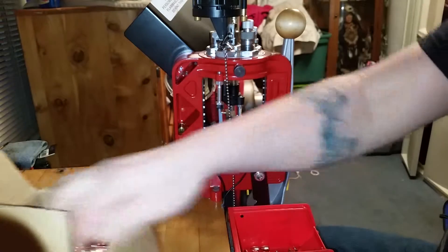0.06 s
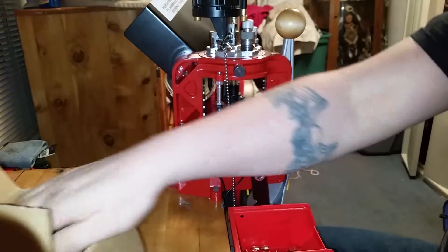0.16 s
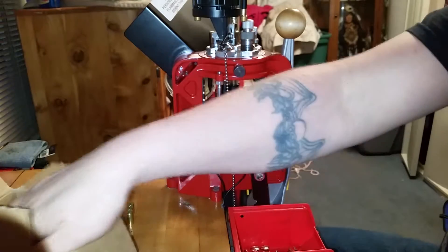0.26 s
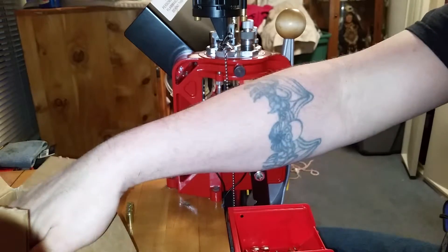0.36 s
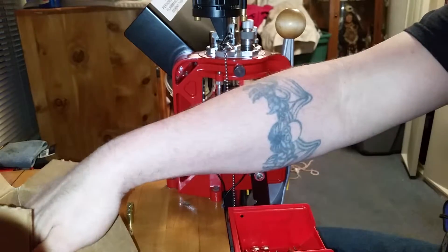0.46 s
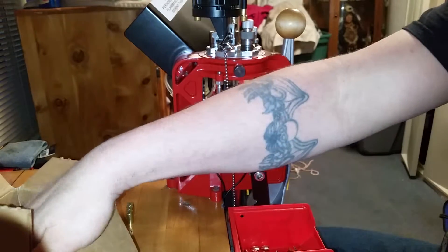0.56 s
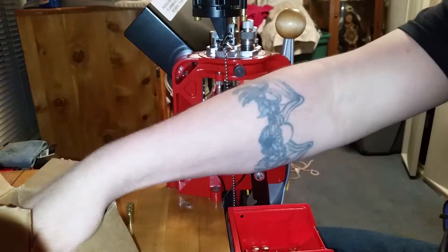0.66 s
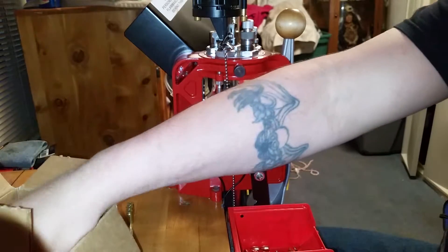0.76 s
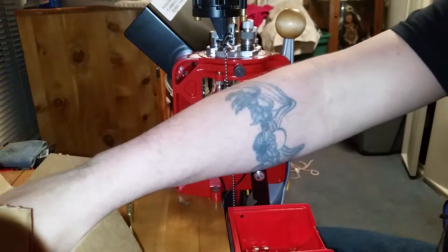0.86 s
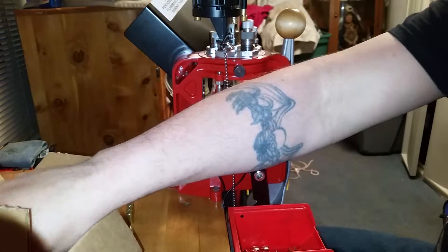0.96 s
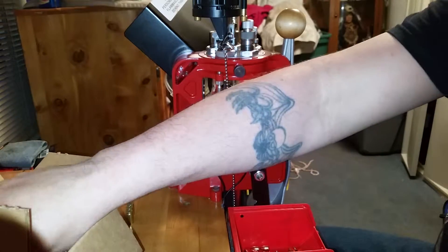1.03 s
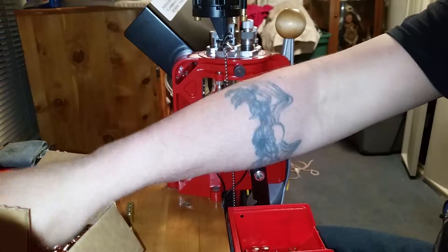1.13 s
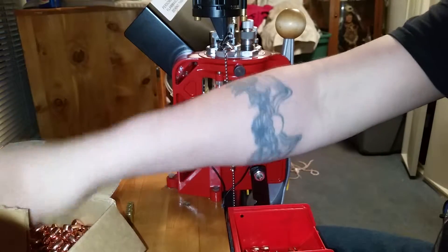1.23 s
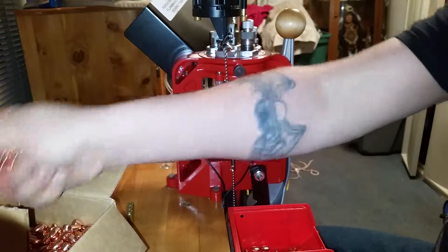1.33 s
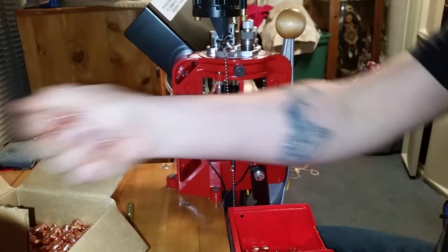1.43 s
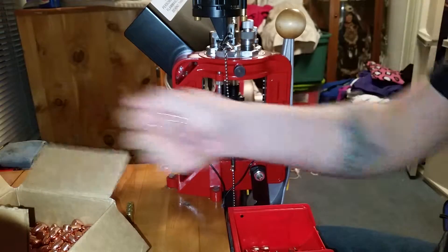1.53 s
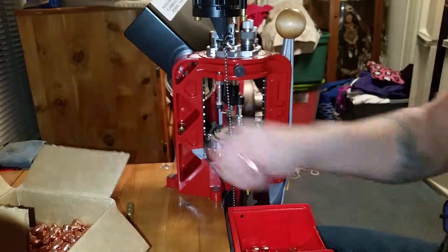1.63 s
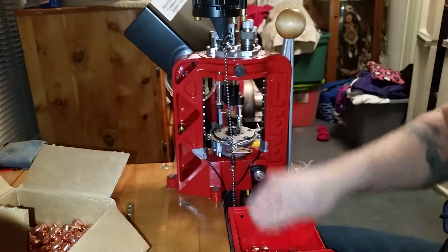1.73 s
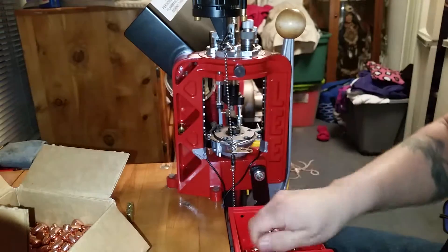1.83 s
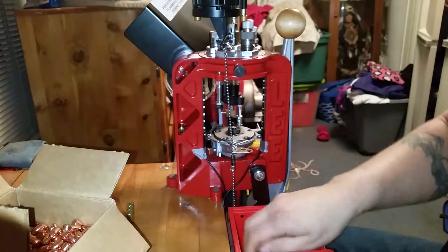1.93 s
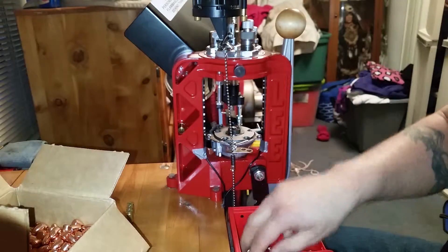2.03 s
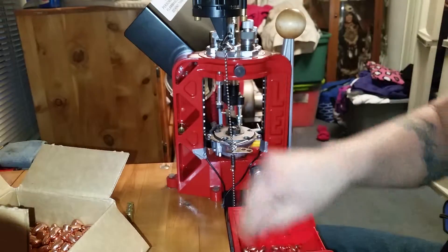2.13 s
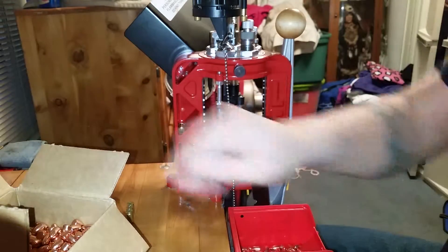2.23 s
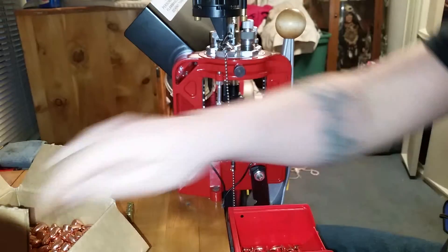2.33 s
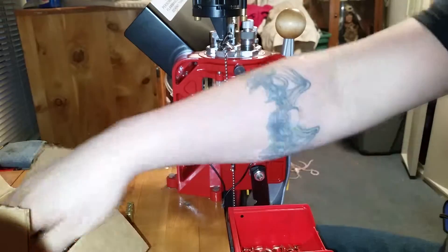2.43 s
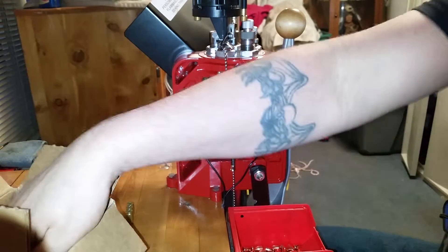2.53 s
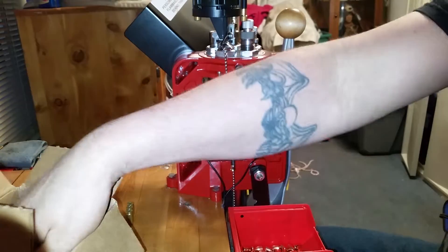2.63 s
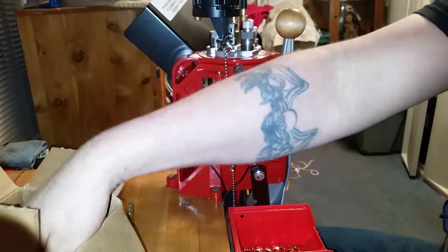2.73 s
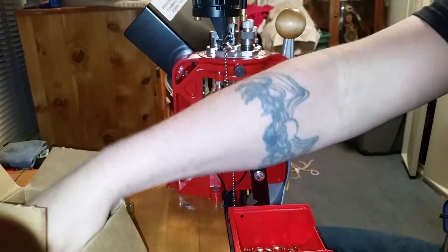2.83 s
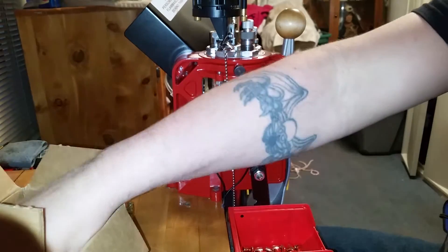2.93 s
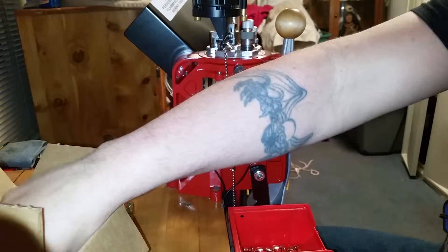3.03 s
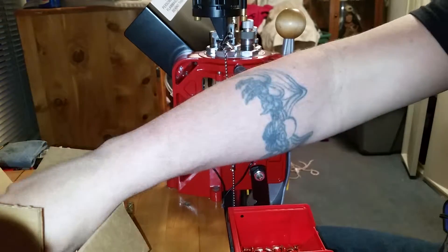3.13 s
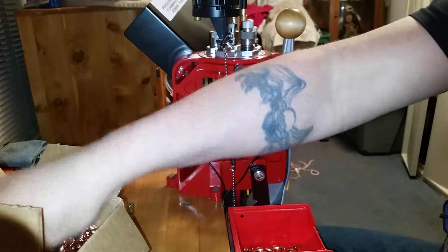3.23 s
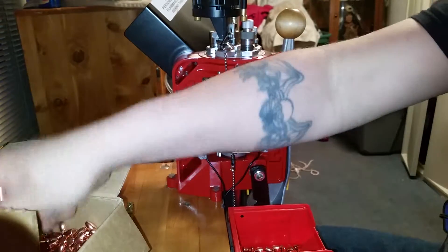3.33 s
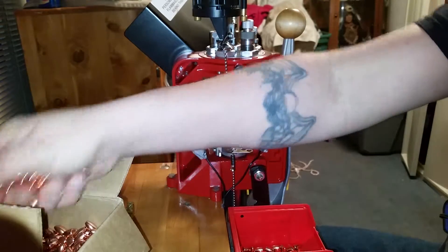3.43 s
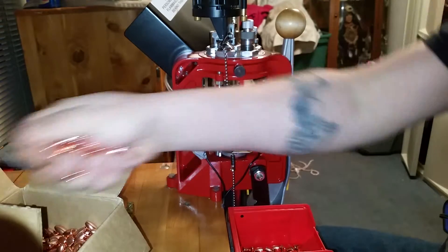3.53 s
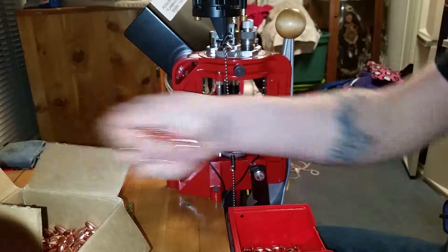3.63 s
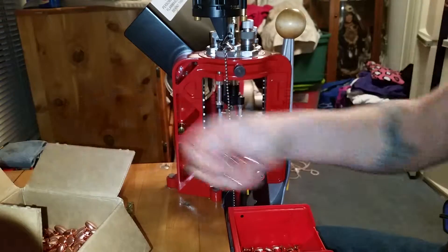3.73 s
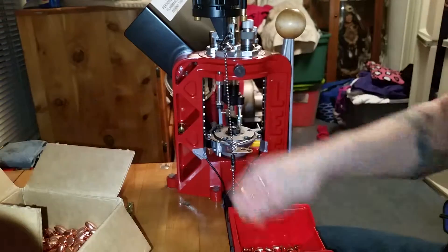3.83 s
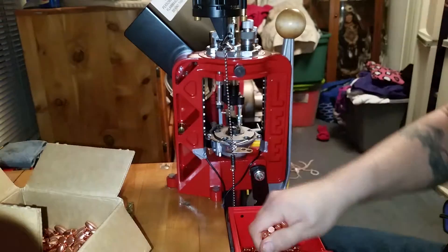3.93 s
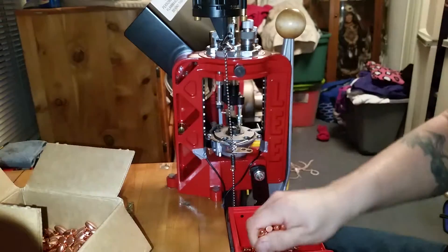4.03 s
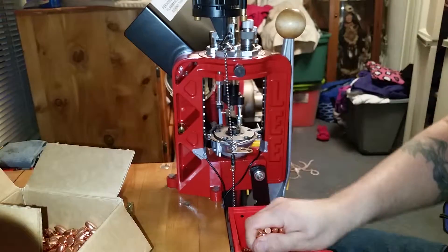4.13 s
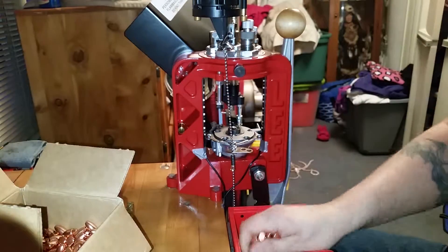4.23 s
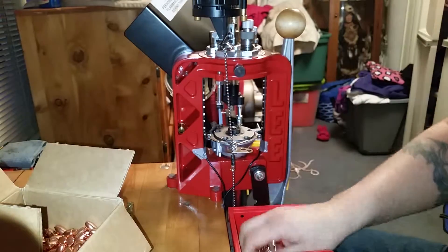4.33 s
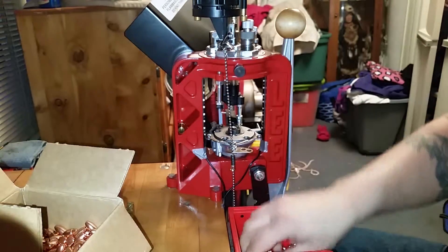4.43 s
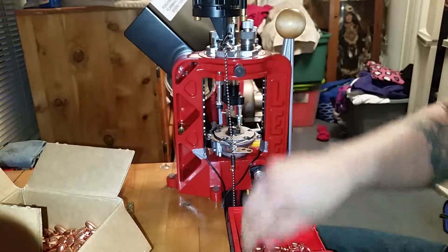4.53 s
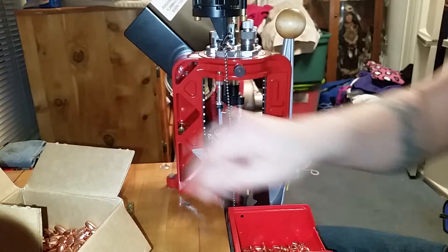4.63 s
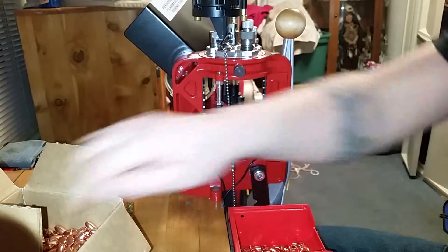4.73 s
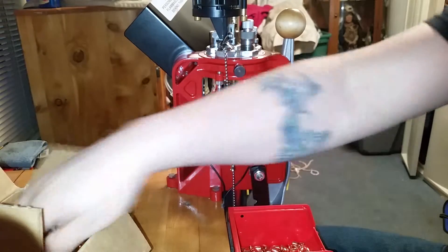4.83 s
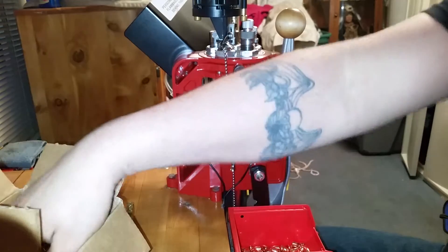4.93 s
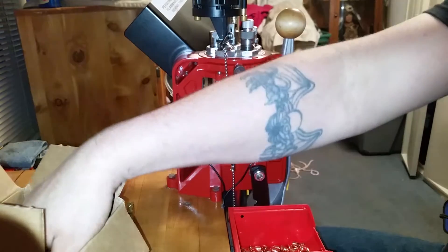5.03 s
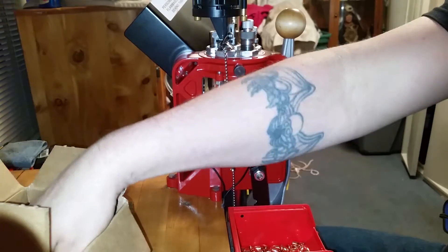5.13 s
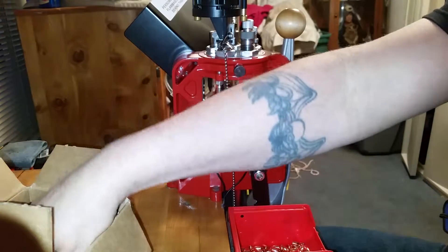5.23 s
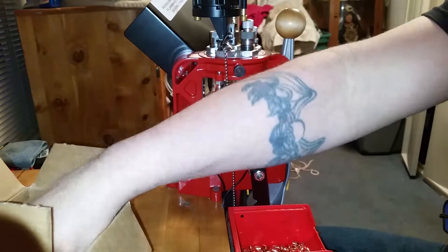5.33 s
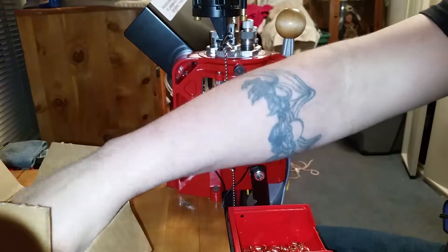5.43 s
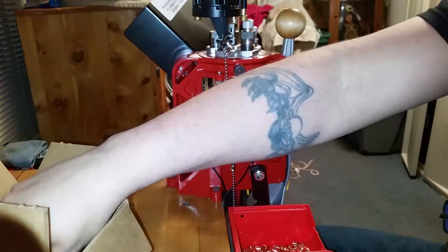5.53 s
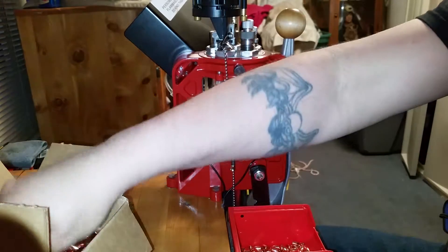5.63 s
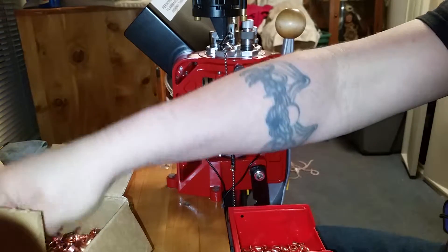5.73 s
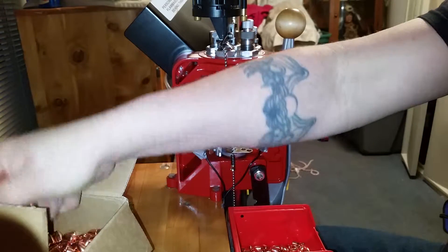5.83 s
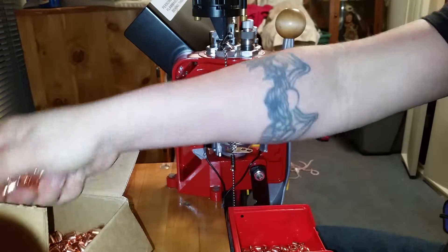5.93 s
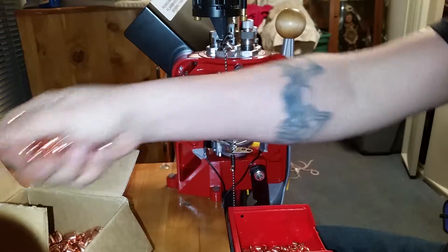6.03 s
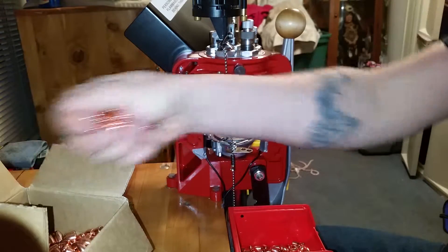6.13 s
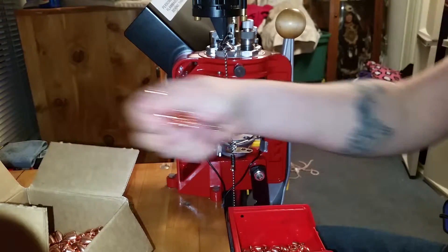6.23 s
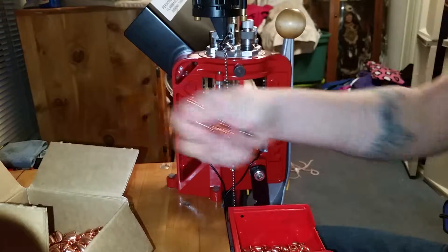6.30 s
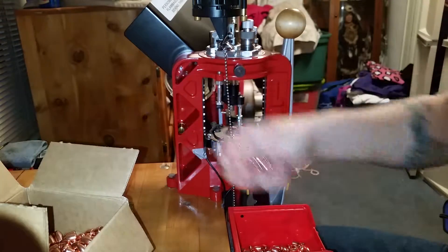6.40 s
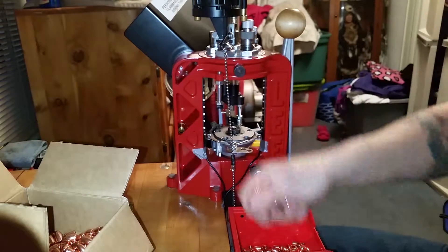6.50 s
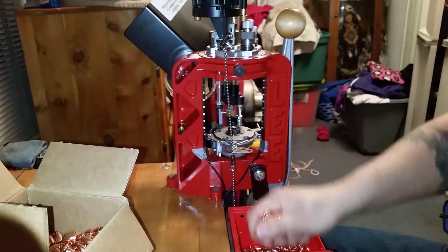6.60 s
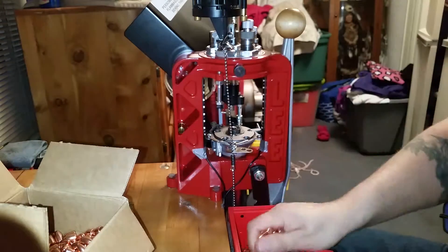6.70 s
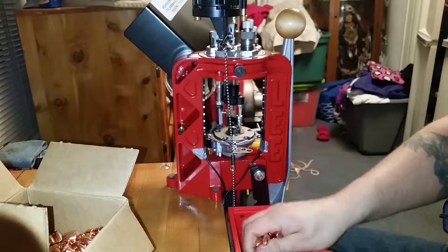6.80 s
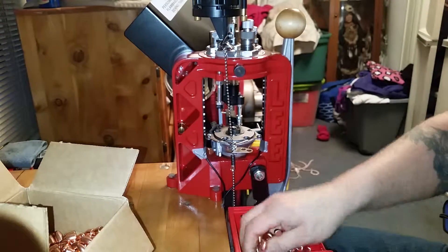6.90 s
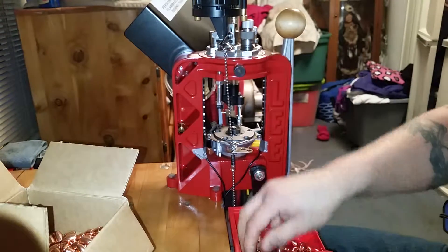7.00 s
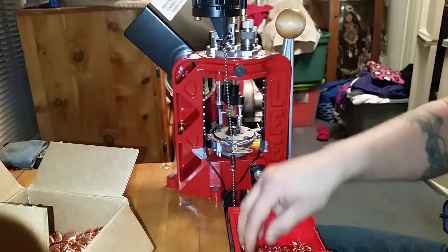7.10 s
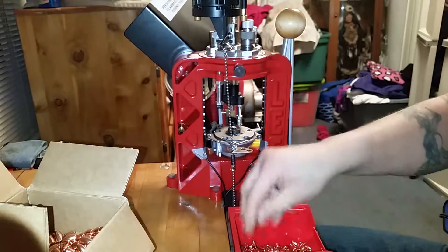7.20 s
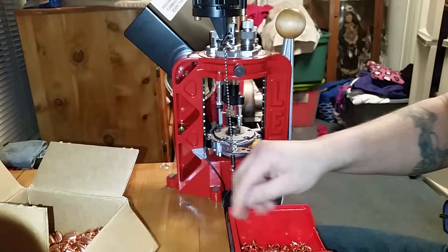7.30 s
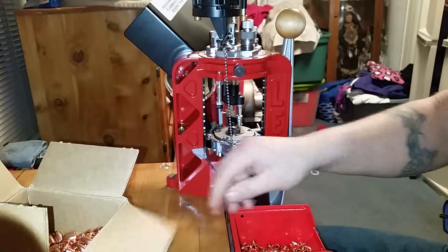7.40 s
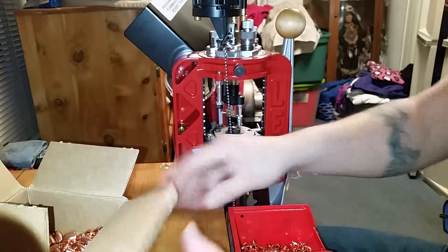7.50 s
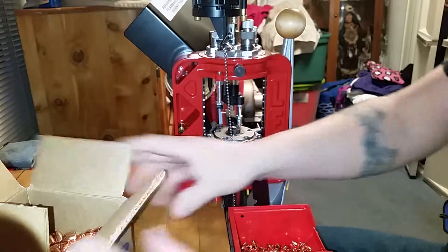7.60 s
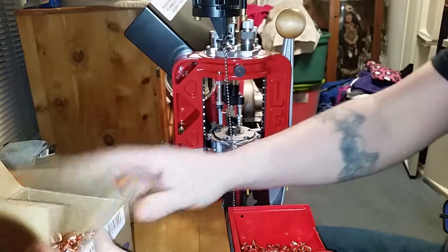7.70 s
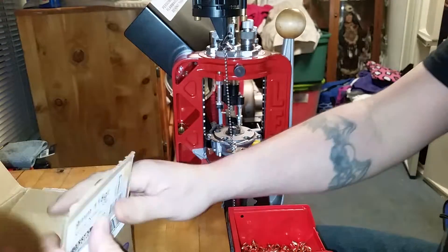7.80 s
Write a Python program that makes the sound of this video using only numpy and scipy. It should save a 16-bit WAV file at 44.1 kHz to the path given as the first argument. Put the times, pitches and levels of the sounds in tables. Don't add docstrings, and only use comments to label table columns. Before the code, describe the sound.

Small metal bullets are dug from a cardboard carton on the left and dropped in three clattering handfuls into a plastic tray on the right.

```python
import sys
import numpy as np
from scipy import signal
from scipy.fft import rfft, irfft, next_fast_len
from scipy.io import wavfile
from scipy.ndimage import uniform_filter1d

SR = 44100
rng = np.random.default_rng(int(sys.argv[2]) if len(sys.argv) > 2 else 0)


def voltage_ratio(level):
    return 10 ** (np.asarray(level, float) / 20)


def put_to_file(sound):
    columns = np.atleast_2d(sound).T
    safe = np.clip(columns, -1, 1)
    whole_steps = np.round(safe * 32767)
    wavfile.write(sys.argv[1], SR, whole_steps.astype(np.int16))


N = 346520
SIZE = next_fast_len(N + 8192)
LOG_HZ = np.log(np.maximum(np.arange(SIZE // 2 + 1) * SR / SIZE, 1))

# freq_hz, level_db_per_hz
FLOOR_COLOUR = [(15, -54), (25, -23), (48, -10.5), (111, -9.5), (146, 17), (202, -13.5), (358, -15.5),
                (568, -25), (2750, -45), (4360, -58), (5880, -61.5), (15200, -45), (16500, -47.5)]
HUM_COLOUR = [(100, -29.5), (126, -7.5), (143, 3.5), (160, -18), (200, -30), (400, -64.0)]
THUD_COLOUR = [(12, -5.0), (25, 0.5), (48, -6.0), (64, 3.5), (85, 0), (110, -5.5), (200, -25.5), (500, -69.0)]
# deepest_s, depth_db, recovery_s
DUCKS = [
    (2.459, -12, 0.49),
    (4.74, -10, 0.27),
    (6.68, -14, 0.036),
    (7.261, -11, 0.098),
]
# time_s, level_db
JOLTS = [(0.049, -40), (2.08, -43.5), (3.43, -55), (3.73, -58), (4.04, -44), (4.37, -44), (4.64, -42.5),
         (4.94, -40.5), (6.75, -48.5), (6.9, -45.5), (7.3, -42), (7.691, -45), (7.81, -44.5)]
# start_s, length_s, hiss_db, low_over_hiss_db
BRUSHES = [(-0.03, 0.27, -33.5, -4), (1.248, .1, -44.5, -6), (1.393, 0.13, -68, 11.5),
           (1.501, 0.11, -38, -9.5), (1.686, 0.12, -72.5, 12), (3.398, 0.076, -43.5, -19),
           (3.569, 0.062, -45.5, -4), (3.602, 0.1, -35, -13), (3.648, 0.072, -35, -9.5),
           (4.012, 0.061, -39.5, 10), (5.793, 0.067, -40, -12), (6.148, 0.067, -43.5, -5.5),
           (6.213, 0.051, -39, -6), (6.737, 0.075, -56, -9), (7.41, 0.23, -61, 6), (7.67, 0.065, -49, 1),
           (7.794, 0.072, -43, -0.5)]
# freq_hz, level_db_per_hz
BRUSH_COLOUR = [(180, -17.5), (300, -12), (597, -9), (834, -17.5), (1740, -11), (2400, -17.5), (9490, 2),
                (15200, -1), (16500, -20)]
# time_s, peak_db
FIST_TICKS = [(1.3428, -28.5), (3.6594, -25.5), (3.7194, -22.5), (5.7994, -22), (5.8247, -26),
              (5.8444, -26), (5.8995, -32), (5.9174, -30), (5.9544, -30), (5.9633, -24), (5.9974, -52),
              (6.0591, -48), (6.0751, -28), (6.098, -40), (6.1335, -56), (6.1335, -35.5), (6.1514, -37),
              (6.1739, -28), (6.7491, -58), (6.7675, -49), (6.7974, -28), (6.8154, -40), (6.8299, -25),
              (6.8433, -19.5), (6.9192, -9.5), (7.2035, -21.5), (7.2424, -33), (7.4061, -32), (7.419, -24),
              (7.7318, -37), (7.8082, -29.5)]
# freq_hz, level_db_per_hz
TICK_COLOUR = [(3000, -43.5), (6000, -26), (8000, -4), (10000, 3), (12500, -7), (15500, -13.5),
               (16500, -22.5)]

# time_s, clink_db
DIGS = [
    [(0.25, -39.5), (0.324, -35), (0.446, -39.5), (0.512, -26.5), (0.588, -27), (0.64, -33), (0.78, -29.5),
     (1.272, -46), (1.42, -62.5)],
    [(2.51, -49), (2.526, -40.5), (2.686, -41), (2.726, -33), (2.866, -37.5), (2.924, -33.5), (3.282, -39),
     (3.358, -45.5), (3.53, -52.5)],
    [(4.93, -51), (4.944, -38), (5.074, -38), (5.134, -29), (5.284, -30.5), (5.382, -28.5), (5.46, -32),
     (5.6, -32.5), (6.04, -56.5)],
]
# time_s, clink_db, middle_db, body_db
BOX_HITS = [(0.4812, -24, -23.5, -23), (1.1752, -38, -23, -50), (1.846, -58.5, -63, -66),
            (1.8642, -51, -75, -49), (2.5222, -41, -26.5, -21.5), (3.334, -38.5, -42, -44),
            (3.485, -30.5, -29, -32.5), (3.7339, -26, -48, -55), (4.934, -41.5, -38, -18),
            (5.784, -22.5, -20.5, -16), (5.9545, -33, -28, -33), (5.9633, -57, -34, -33),
            (6.0585, -51, -46, -52), (6.0751, -37, -37, -47), (6.098, -35.5, -33, -55),
            (6.134, -41, -37, -59), (6.1498, -46, -40, -60), (6.1715, -34, -27, -44),
            (6.3028, -54, -41, -57), (6.353, -39.5, -38.5, -67), (7.419, -31, -41, -26.5),
            (7.4704, -38, -42, -48), (7.5233, -39, -43, -46), (7.5384, -35.5, -42, -59),
            (7.546, -35.5, -49, -59), (7.5732, -37, -38, -31.5), (7.628, -43, -40, -50),
            (7.7018, -33, -31, -21.5), (7.7317, -48.5, -40, -49), (7.7568, -33, -32.5, -33),
            (7.8083, -34, -39, -27.5)]
# time_s, boom_db, scrape_db
BOX_THUMPS = [(0.269, -28.5, -26), (0.428, -29, -20), (0.52, -15.5, -18), (0.604, -42.5, -27),
              (0.799, -34.5, -5), (1.018, -24, -9.5), (1.612, -42, -23.5), (2.566, -25.5, -13),
              (2.948, -48, -3), (3.249, -26.5, -27), (3.722, -50, -20), (3.736, -49, -18.5),
              (5.2, -41, -28), (5.446, -14, -20), (5.458, -16, -28), (5.598, -22, 2.5), (5.858, -46, -9),
              (5.897, -46, -10), (5.978, -32, -39), (6.047, -34, -33), (6.076, -38, -14.5),
              (6.173, -39, -14), (6.268, -39, -20.5), (7.526, -45, -17), (7.758, -40.5, -13.5),
              (7.783, -37.5, -23), (7.813, -46, -41)]
# time_s, peak_db
FLAP_LUMPS = [(0.27, -32.5), (0.331, -29), (0.344, -23), (0.39, -39), (0.424, -15), (0.478, -13.5),
              (0.503, -14.5), (0.575, -10), (0.651, -30), (0.745, -17.5), (0.778, -12), (0.834, -19),
              (0.863, -24.5), (0.881, -30.5), (0.99, -21.5), (1.035, -24), (1.052, -21), (1.141, -20.5),
              (2.55, -32), (2.568, -26), (2.59, -31), (2.62, -28), (2.654, -21), (2.696, -17),
               (2.753, -25), (2.806, -32), (2.839, -32), (2.892, -17), (2.922, -30), (2.95, -20),
               (2.984, -25), (3.214, -14), (3.363, -23), (3.484, -22),
              (4.946, -16), (5.05, -23), (5.11, -9.5), (5.153, -12), (5.198, -17), (5.312, -23),
               (5.326, -17), (5.415, -18), (5.443, -6), (5.529, -16), (5.549, -10), (5.598, -14),
               (5.682, -25), (5.714, -38), (5.732, -22), (5.785, -7.5)]
# freq_hz, level_db_per_hz
BOX_COLOUR = [(260, -22), (450, -31), (539, -4.5), (656, -16.5), (707, -1.5), (1000, -3), (1530, -2),
              (2550, -7.5), (6580, -15.5), (10200, -7.5), (15300, -23), (16500, -38.5)]
# freq_hz, level_db, t60_s
BOX_MODES = [(225, -8.5, 0.025), (268, -19, 0.049), (290, -12.5, 0.089), (328.6, -1, 0.1), (353, 1, 0.15),
             (463, 0, 0.087)]
# freq_hz, level_db, t60_s
FLAP_MODES = [(574, -5.5, 0.017), (657, -6.5, 0.018), (635, -1.5, 0.056), (840, -14, 0.014),
              (1160, -34, 0.024), (1270, -4.5, 0.069), (1376, 0.5, 0.036), (1516, -2.5, 0.027),
              (1818, 0, 0.045)]

# time_s, clink_db
POURS = [
    [(1.96, -21), (2.016, -52), (2.024, -24.5), (2.096, -23.5), (2.382, -30.5), (2.402, -54), (2.412, -32),
     (2.5, -44)],
    [(4.23, -32.5), (4.268, -40), (4.338, -25), (4.354, -21.5), (4.614, -22.5), (4.78, -51), (4.8, -63)],
    [(6.81, -39), (6.85, -27), (6.998, -20.5), (7.2, -26), (7.238, -26), (7.316, -35.5), (7.41, -52)],
]
# time_s, clink_db, middle_db, body_db
TRAY_HITS = [(1.911, -56, -53.5, -45.5), (1.917, -49, -44, -36.5), (1.925, -40, -35.5, -31),
             (1.9584, -20.5, -29, -23), (2.0233, -8.5, -18.5, -20), (2.3331, -29.5, -35.5, -29.5),
             (2.4076, -11, -16.5, -36), (2.4263, -33.5, -30, -46), (2.4582, -39.5, -27.5, -39.5),
             (4.0444, -14.5, -46, -27.5), (4.1825, -16, -24.5, -14.5), (4.2237, -7, -20, -14),
             (4.229, -17.5, -29.5, -21), (4.2484, -30.5, -33, -31), (4.2858, -27.5, -23, -46),
             (4.3005, -26, -31, -22), (4.3156, -11, -22.5, -17.5), (4.7217, -19.5, -23.5, -34),
             (4.7835, -28.5, -52.5, -44), (4.817, -28.5, -53, -65), (4.8509, -37, -50, -58),
             (4.8763, -38, -54, -57), (6.8158, -35, -42, -22.5), (6.8319, -20, -45.5, -23.5),
             (6.8898, -17, -32, -17.5), (7.2434, -28, -25, -24), (7.3464, -20, -48, -39.5),
             (7.4065, -38, -43, -44)]
# time_s, body_db, rattle_db
TRAY_KNOCKS = [(1.965, -11, -29), (1.975, -14.5, -23.5), (1.983, -17.5, -27.5), (1.997, -16.5, -31),
               (2.054, -11, -25.5), (2.074, -14.5, -28), (2.082, -3.5, -23.5), (2.103, -6, -27),
               (2.118, -8, -31.5), (2.135, -13, -36), (2.151, -11, -30), (2.165, -6, -24.5),
               (2.188, -10.5, -24), (2.206, -10, -22.5), (2.236, -21.5, -21), (2.255, -12, -24.5),
               (2.288, -16.5, -36), (2.353, -15, -25), (2.377, -26.5, -26),
               (4.334, -13.5, -26), (4.354, -10.5, -26.5), (4.369, -6, -26.5), (4.386, -13.5, -26),
                 (4.397, -8.5, -28), (4.417, -7, -29.5), (4.435, -19, -22), (4.45, -7.5, -27.5),
                 (4.465, -11.5, -24.5), (4.502, -10, -25.5), (4.524, -13.5, -28), (4.543, -14, -28.5),
                 (4.56, -21.5, -28.5), (4.58, -18, -27), (4.616, -15, -29), (4.634, -26.5, -28),
               (6.844, -13, -30), (6.851, -20, -32), (6.871, -12, -38), (6.919, -23, -28),
                 (6.932, -14, -31), (6.953, -20, -33), (6.967, -14, -31), (6.974, -12.5, -32),
                 (6.999, -13, -33), (7.018, -13, -32), (7.045, -20, -28), (7.056, -36, -31),
                 (7.092, -18, -28), (7.109, -19, -23), (7.151, -12.5, -33), (7.169, -24, -31),
                 (7.203, -22, -30), (7.267, -34, -32)]
# time_s, peak_db
ROLLS = [(2.3007, -25), (2.3106, -12), (2.3444, -24), (2.4274, -24), (2.4806, -24.5), (4.7035, -38),
         (4.7445, -28), (4.7646, -27.5), (4.7894, -46), (4.8174, -42), (7.2858, -26), (7.3094, -34),
         (7.3824, -35)]
# freq_hz, level_db_per_hz
TRAY_COLOUR = [(650, -41), (1100, -22.5), (1270, 3), (2540, -0.5), (2880, -4), (3740, -4.5), (7380, -6.5),
               (10300, -4.5), (15200, -17.5), (15900, -13), (16500, -32)]
# freq_hz, level_db_per_hz
BENCH_COLOUR = [(100, -56.5), (200, -16), (320, 2), (420, -32.0), (900, -49.5)]
# freq_hz, level_db, t60_s
TRAY_MODES = [(553, 3, 0.04), (602, -9, 0.012), (718, -1, 0.031), (756, -3, 0.045), (810, -6, 0.032),
              (855, 6.5, 0.05), (921.4, 0.5, 0.1), (905, -25.5, 0.032)]
# freq_hz, level_db, t60_s
HEAP_MODES = [(1030, -6, 0.014), (1196, 7.5, 0.047), (1310, 7.5, 0.08), (1420, -2.5, 0.085),
              (1620, -13, 0.022)]
# freq_hz, level_db, t60_s
BED_MODES = [(1780, -4, .03), (1980, -3.5, 0.039), (2240, -1.5, 0.056), (2495, -3.5, .03),
             (2710, -4.5, .035), (3615, -2, .03), (3930, -3.5, 0.033), (4450, -5, 0.028),
             (4665, -3.5, .025)]

# freq_hz, difference_db
PORT_TILT = [(60, 4), (200, 0), (700, -2), (1300, -1), (2400, -2.5), (4300, -11), (6000, -12), (8000, -5.5),
             (10000, 7), (15000, 5.5)]
# freq_hz, share_0_to_1
LIKENESS = [(30, 0.2), (60, 0.8), (120, .95), (300, 0.75), (700, 0.6), (1400, 0), (3000, 0), (16000, 0)]
# freq_hz, gain_db
MIC_RESPONSE = [(150, 0), (380, 0), (450, -7), (520, 0), (15750, 0), (15950, -40), (22000, -60)]
# freq_hz, level_db_per_hz
HISS_COLOUR = [(1500, -25.5), (3000, -3.0), (4200, 13.5), (5200, 0), (8000, -41.5)]

FLOOR_DB, HUM_DB, THUD_TILT_DB = -62.5, -49.5, -6
SINK_S = 0.29
THUD_RISE_S, THUD_FALL_DB_S = .03, 55
SHAKE_DB, SHAKE_SHARE, STILL_DB = -48, 0.13, -63.5
BRUSH_ATTACK_S, BRUSH_SWELL_DB, BRUSH_FALL_DB_S = 0.023, -1, 436
SQUEAK_S, SQUEAK_LENGTH_S, SQUEAK_HZ, SQUEAK_WIDTH_HZ, SQUEAK_DB = 6.74, 0.071, 2640, 72, -68
ROOM_T60_S, ROOM_DB = .2, -7
TICK_SHARE, TICK_T60_S, RING_T60_S, RIPPLE_DB = .3, .005, .025, 1.4
SETTLE_S, FIRST_SHARE = .006, .8
# (dB at the start, dB per s, dB per dB of effort or flow)
SCRAPE_DB, BOOM_DB = (4., 6.5, 0.15), (-1, 1.5, -0.07)
RATTLE_DB, HOLLOW_DB, HEAP_DB = (2, -1.5, 0.32), (3.5, -16, -0.05), (-10, 34.5, 0.24)
FILL_DB = -1.5
LOAD_DB_OCT, LOADED_S = 7.5, 3.25
BED_DB_OCT_S = -1


def unit(x):
    return x / np.sqrt(np.mean(x ** 2))


def on_hz(table):
    hz, value = np.transpose(table)
    return np.interp(LOG_HZ, np.log(hz), value)


def slope(hz, db_per_octave):
    octaves = (LOG_HZ - np.log(hz)) / np.log(2)
    return -abs(db_per_octave) * np.maximum(np.sign(db_per_octave) * octaves, 0)


def causal(db):
    cepstrum = irfft(db * np.log(10) / 20, SIZE)
    cepstrum[1:SIZE // 2] *= 2
    cepstrum[SIZE // 2 + 1:] = 0
    return np.exp(rfft(cepstrum))


def spread(trail, response):
    like = np.clip(on_hz(LIKENESS), 0, 1)
    mid, side = rfft(trail * rng.standard_normal((2, N)), SIZE) * response
    mid = mid * np.sqrt((1 + like) / 2)
    side = side * np.sqrt((1 - like) / 2)
    return irfft(np.array([mid + side, mid - side]), SIZE)[:, :N]


def place(pair, lag_samples):
    return np.array([np.roll(pair[0], int(round(lag_samples))), pair[1]])


def fade(energy, t60_s):
    p = np.exp(-2 * np.log(1000) / (t60_s * SR))
    return signal.lfilter([1 - p], [1, -p], energy)


def curves(tables, rules, step_db=0):
    t = np.arange(N) / SR
    out = np.full((len(rules) + 1, N), -120.)
    for k, table in enumerate(tables):
        s, db = np.transpose(table)
        inside = (t >= s[0]) & (t <= s[-1])
        control = np.interp(t[inside], s, db)
        out[0, inside] = control
        for row, (start_db, db_per_s, db_per_db) in enumerate(rules, 1):
            out[row, inside] = start_db + db_per_s * (t[inside] - s[0]) + db_per_db * (control - db.max())
        out[2, inside] += k * step_db
    return out


def collisions(db, rate_hz, thin, scatter_db, fine):
    db = db.copy()
    chance = np.clip(rate_hz / SR * voltage_ratio(thin * (db[0] + 33.0)), 1e-3, .5)
    size = voltage_ratio(scatter_db * np.minimum(rng.exponential(size=N), 4))
    db[1:] += db[0]
    draw, fine = rng.random(N), np.clip(fine, 0, 1)
    coarse = (draw < chance) * size ** 2 / chance / np.mean(size ** 2)
    grit = 5 * (draw > .8)
    weight = (1 - fine) * coarse + fine * grit
    struck = (weight > 0) & (db[0] > -100)
    energy = np.zeros(db.shape)
    energy[:, struck] = weight[struck] * voltage_ratio(2 * db[:, struck])
    return energy


def singles(hits, push_db):
    push_db = np.array(push_db)
    energy = np.zeros((len(push_db), N))
    late_s = np.cumsum(rng.random((len(hits), 3)), axis=1) * SETTLE_S / 2
    for (s, *peak_db), after_s in zip(hits, late_s):
        power = voltage_ratio(2 * (np.array(peak_db) + push_db))
        energy[:, int(s * SR)] += power * FIRST_SHARE
        settle = np.minimum(((s + after_s) * SR).astype(int), N - 1)
        energy[:, settle] += power[:, None] * (1 - FIRST_SHARE) / 3
    return energy


def crackle(energy, db, t60_s):
    near = TICK_SHARE * fade(energy, TICK_T60_S) + (1 - TICK_SHARE) * fade(energy, t60_s)
    reply = voltage_ratio(2 * ROOM_DB) * fade(fade(energy, .01), ROOM_T60_S)
    trail = np.sqrt(near + reply)
    ripple = uniform_filter1d(rng.standard_normal(len(db)), size=400)
    db = db + RIPPLE_DB * unit(uniform_filter1d(ripple, size=400))
    return spread(trail, causal(db)) / np.sqrt(np.mean(voltage_ratio(2 * db)))


def ring(energy, modes, patchy_db, push_samples, tilt_db=0):
    direct, broad = 0, 0
    struck = np.flatnonzero(energy)
    luck = rng.standard_normal(N)
    turn = np.exp(-2j * np.pi * np.arange(SIZE // 2 + 1) / SIZE)
    hold = SR // 16
    for k, (hz, db, t60_s) in enumerate(modes):
        start = k * N // len(modes)
        blow = np.sqrt(energy)
        blow[struck] *= np.sign(luck[struck]) + .3 * luck[(struck + start + 1) % N]
        patch_db = patchy_db * luck[struck // hold + start]
        drift_db = tilt_db * struck / SR * np.log2(hz / modes[-1][0])
        blow[struck] *= voltage_ratio(patch_db + drift_db)
        p = np.exp(2j * np.pi * hz / SR - np.log(1000) / (t60_s * SR))
        tone = signal.lfilter([p.imag], [1, -2 * p.real, abs(p) ** 2], blow)
        direct = direct + voltage_ratio(db) * np.sqrt(1 - abs(p) ** 2) * tone
        wide = p * abs(p)
        broad = broad + voltage_ratio(db) * np.sqrt(1 - abs(wide) ** 2) / (1 - wide * turn) / 2
    contact = np.hanning(int(push_samples) + 2) * 2 / (push_samples + 1)
    direct = signal.lfilter(contact, [1], direct)
    echo = spread(voltage_ratio(ROOM_DB + 0.5) * np.sqrt(fade(fade(energy, 0.024), ROOM_T60_S)), broad)
    cut = signal.butter(N=4, Wn=.9 * modes[0][0], btype="high", fs=SR, output="sos")
    return signal.sosfilt(cut, direct + echo)


def duck_db(t):
    return sum(np.interp(t, [s - SINK_S, s, s + abs(back_s)], [0, db, 0]) for s, db, back_s in DUCKS)


def bench_db(t):
    effort_db = np.maximum(curves(DIGS, [SCRAPE_DB, BOOM_DB])[0], -90)
    effort_db = uniform_filter1d(effort_db, size=4000)
    power = voltage_ratio(2 * STILL_DB) + voltage_ratio(2 * (SHAKE_DB + SHAKE_SHARE * (effort_db + 35.0)))
    for s, db in JOLTS:
        envelope_db = np.interp(t - s, [-THUD_RISE_S, 0, 1], [-40, 0, -THUD_FALL_DB_S])
        power = power + voltage_ratio(2 * (db + envelope_db))
    return 10 * np.log10(power)


def room():
    t = np.arange(N) / SR
    air = unit(spread(1, voltage_ratio(on_hz(FLOOR_COLOUR) + slope(226, -29)))) * voltage_ratio(FLOOR_DB + 5.5)
    hum = unit(spread(1, voltage_ratio(on_hz(HUM_COLOUR))))
    thud = unit(spread(1, voltage_ratio(on_hz(THUD_COLOUR))))
    thud_db = bench_db(t) + duck_db(t) / 2 + THUD_TILT_DB * np.array([[.5], [-.5]])
    return air + hum * voltage_ratio(HUM_DB + duck_db(t)) + thud * voltage_ratio(thud_db)


def strokes():
    t = np.arange(N) / SR
    out = np.full((2, N), -120.)
    fall_s = 40 / BRUSH_FALL_DB_S
    for s, length_s, db, low_db in BRUSHES:
        knots_s = [0, BRUSH_ATTACK_S, max(length_s, BRUSH_ATTACK_S), length_s + fall_s]
        shape = db + np.interp(t - s, knots_s, [-30, -BRUSH_SWELL_DB, 0, -40], -200, -200)
        leads = shape > out[0]
        out[0, leads] = shape[leads]
        out[1, leads] = low_db
    return out


def brush():
    hiss, low = collisions(strokes(), 2300, thin=.21, scatter_db=6.0, fine=0.84)
    shape = on_hz(BRUSH_COLOUR)
    high = voltage_ratio(-2.0) * crackle(hiss, shape + slope(2800, -6.5), .01)
    rub = voltage_ratio(-3.0) * crackle(low, shape + slope(2800, 18.7), 0.016)
    bed = voltage_ratio(-18.5) * ring(low, BED_MODES, 3.2, SR // 9000)
    return high + rub + bed


def squeak():
    t = np.arange(N) / SR - SQUEAK_S
    edges_hz = [SQUEAK_HZ - SQUEAK_WIDTH_HZ / 2, SQUEAK_HZ + SQUEAK_WIDTH_HZ / 2]
    band = signal.butter(2, edges_hz, "band", fs=SR, output="sos")
    envelope = np.interp(t, [0, .02, SQUEAK_LENGTH_S, SQUEAK_LENGTH_S + .01], [0, 1, 1, 0])
    return unit(signal.sosfilt(band, rng.standard_normal(N))) * voltage_ratio(SQUEAK_DB) * envelope


def fist():
    return place(crackle(singles(FIST_TICKS, [12.])[0], on_hz(TICK_COLOUR), .012), -2)


def box():
    tracks = curves(DIGS, [SCRAPE_DB, BOOM_DB])
    energy = collisions(tracks, 900, thin=0.66, scatter_db=3.5, fine=0.59)
    clink, scrape, boom = energy + singles(BOX_HITS, [15., 20., 20.])
    thump_boom, thump_scrape = singles(BOX_THUMPS, [25., 8.])
    lumps = singles(FLAP_LUMPS, [15.5])[0]
    shape = on_hz(BOX_COLOUR)
    high = voltage_ratio(2.5) * crackle(clink, shape + slope(2700, -16.5), RING_T60_S)
    middle = voltage_ratio(-3.5) * crackle(scrape, shape + slope(2100, 17.2) + slope(440, -20.0), .02)
    knocks = voltage_ratio(-8.5) * ring(voltage_ratio(-5.) * scrape + thump_scrape + lumps, FLAP_MODES, 3.7, SR // 2200)
    walls = voltage_ratio(-7.5) * ring(boom + thump_boom, BOX_MODES, 2.4, SR // 500)
    return place(high + middle + knocks + walls, -6)


def tray():
    tracks = curves(POURS, [RATTLE_DB, HOLLOW_DB, HEAP_DB], FILL_DB)
    clink, rattle, hollow, heap = collisions(tracks, 900, thin=0.65, scatter_db=3.5, fine=0.25)
    hit_clink, hit_rattle, hit_hollow = singles(TRAY_HITS, [12., 20., 27.])
    knock_hollow, knock_rattle = singles(TRAY_KNOCKS, [17., 20.])
    hit_rattle = hit_rattle + knock_rattle
    clink, rattle = clink + hit_clink, rattle + hit_rattle
    hollow = hollow + hit_hollow + knock_hollow
    heap = heap + voltage_ratio(-7.5) * hit_rattle + singles(ROLLS, [24.])[0]
    shape = on_hz(TRAY_COLOUR)
    high = voltage_ratio(0.5) * crackle(clink, shape + slope(4000, -13.0), RING_T60_S)
    middle = voltage_ratio(-2.5) * crackle(rattle, shape + slope(3340, 14) + slope(1300, -28.5), 3.2 * RING_T60_S)
    body = voltage_ratio(-7.0) * ring(hollow, TRAY_MODES, 1.2, SR // 1500, LOAD_DB_OCT / LOADED_S)
    clack = voltage_ratio(-18.0) * ring(heap, HEAP_MODES, 2, SR // 3000)
    bench = voltage_ratio(-19.5) * crackle(hollow, on_hz(BENCH_COLOUR), 0.048)
    bed = voltage_ratio(-10.0) * ring(rattle, BED_MODES, 2.6, SR // 9000, BED_DB_OCT_S)
    return place(high + middle + body + clack + bed + bench, 4)


def scene():
    return room() + brush() + squeak() + fist() + box() + tray()


def roll_off(x):
    return signal.sosfilt(signal.butter(12, 16810, fs=SR, output="sos"), x)


def record(dry):
    tilt = on_hz(PORT_TILT) / 2
    top = on_hz(MIC_RESPONSE)
    ports = np.array([causal(top + tilt), causal(top - tilt)])
    x = irfft(rfft(dry, SIZE) * ports, SIZE)[:, :N]
    hiss = spread(1, voltage_ratio(on_hz(HISS_COLOUR)))[0]
    x[1] += voltage_ratio(-55.0) * unit(hiss)
    return roll_off(np.clip(x, -.9, .9))


dry = scene()
out = record(dry)
put_to_file(out)
```